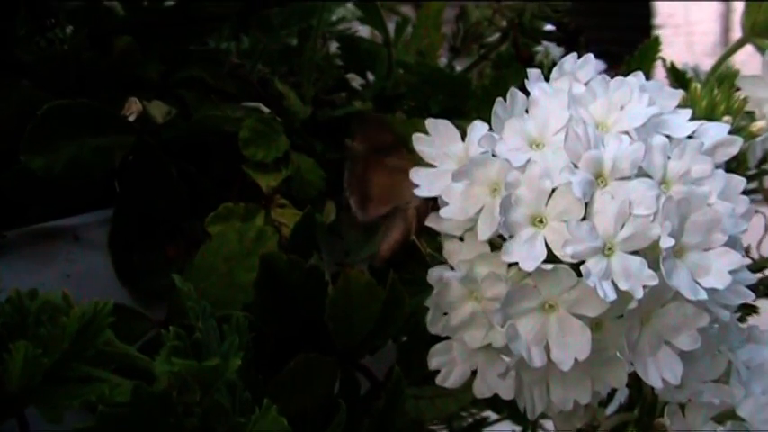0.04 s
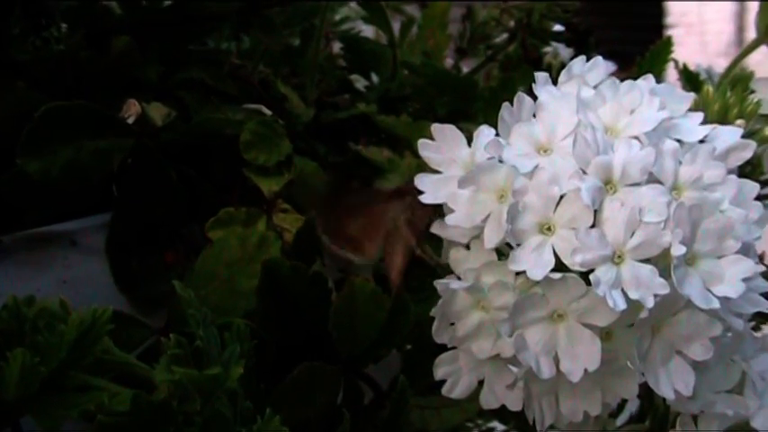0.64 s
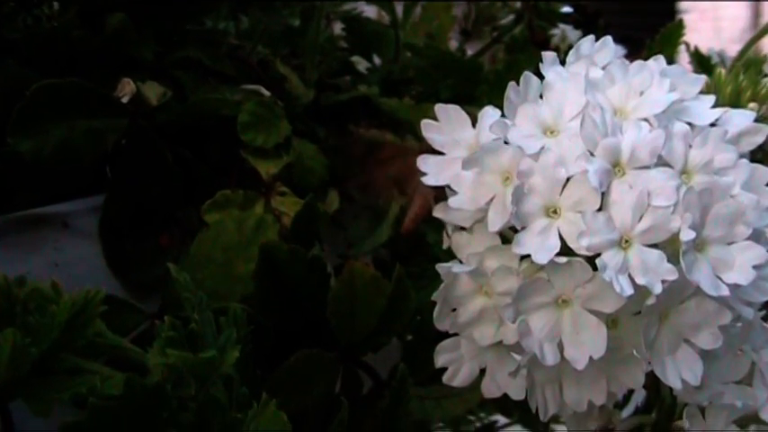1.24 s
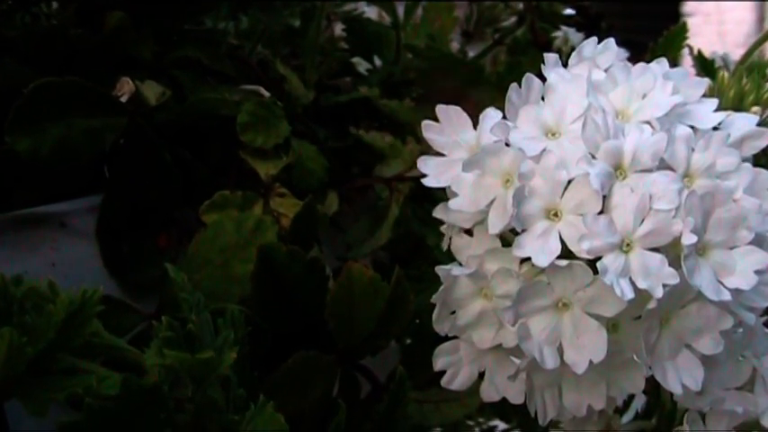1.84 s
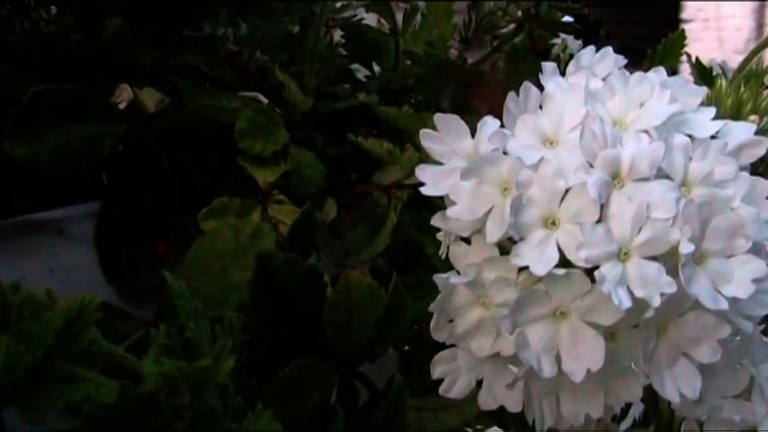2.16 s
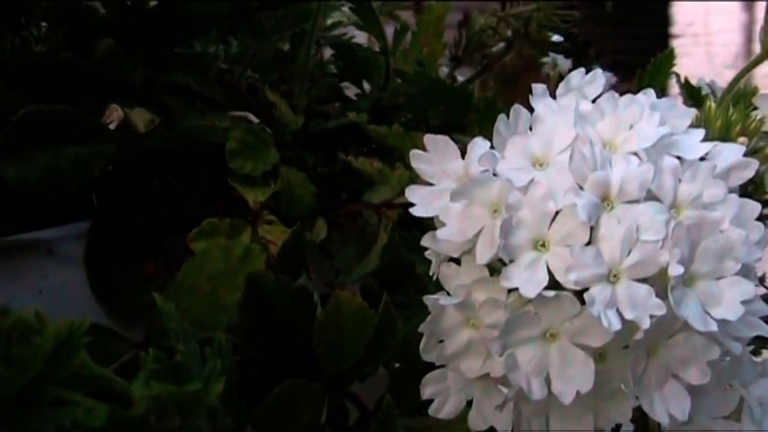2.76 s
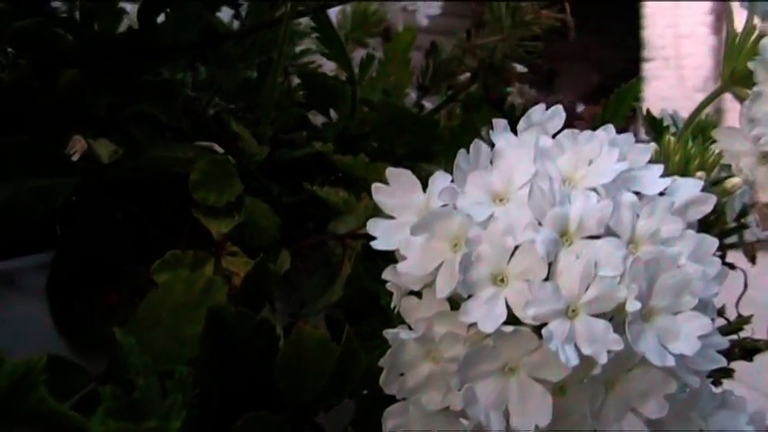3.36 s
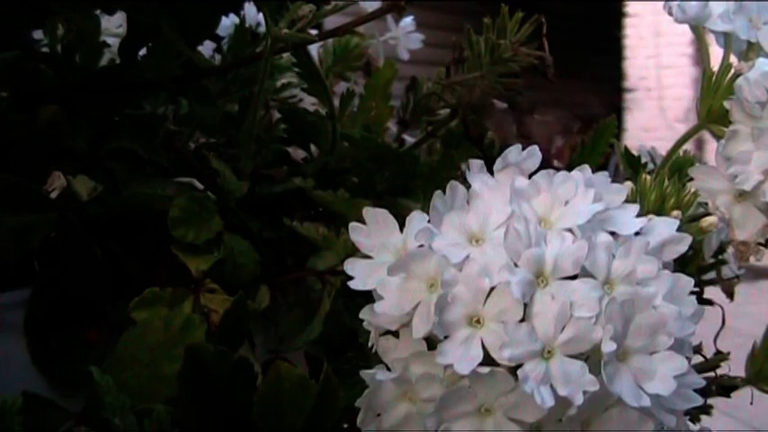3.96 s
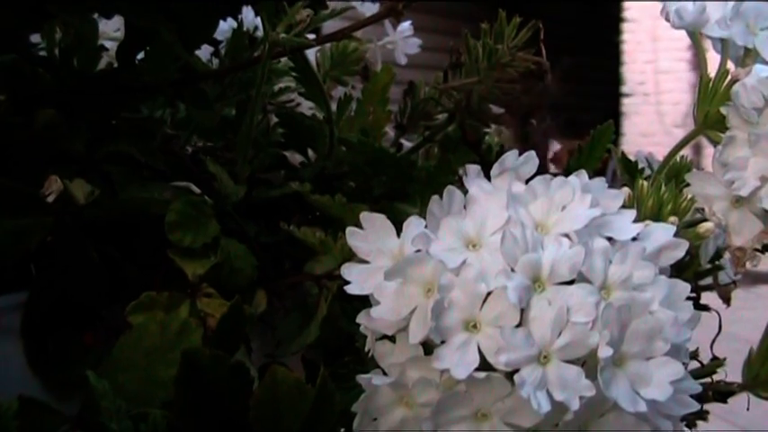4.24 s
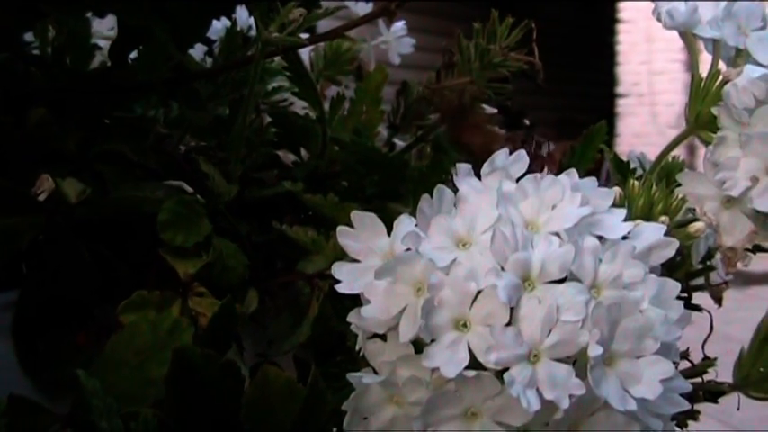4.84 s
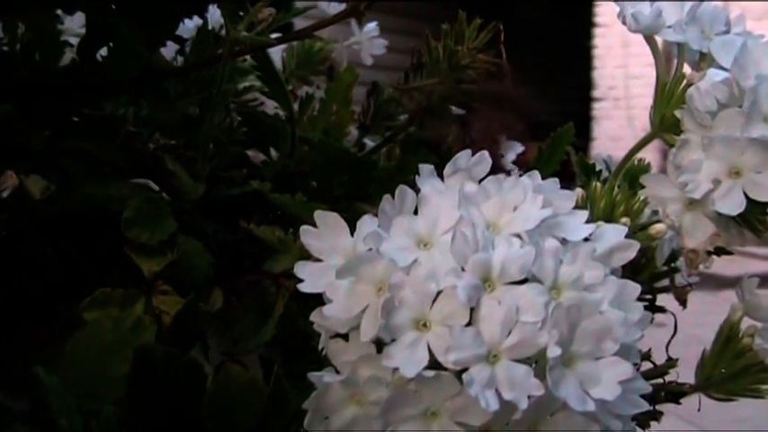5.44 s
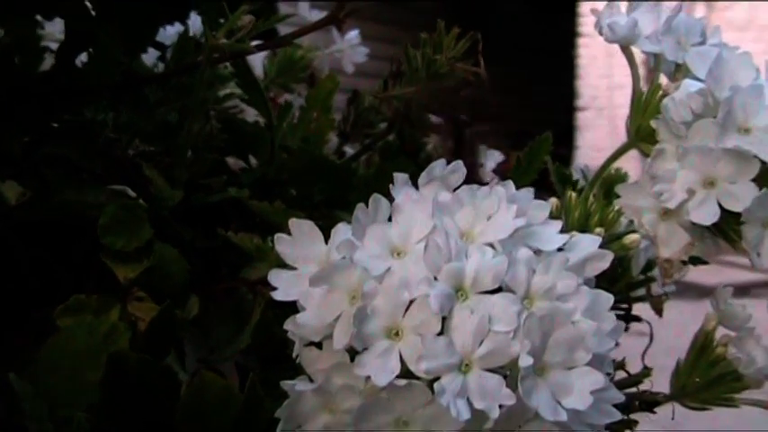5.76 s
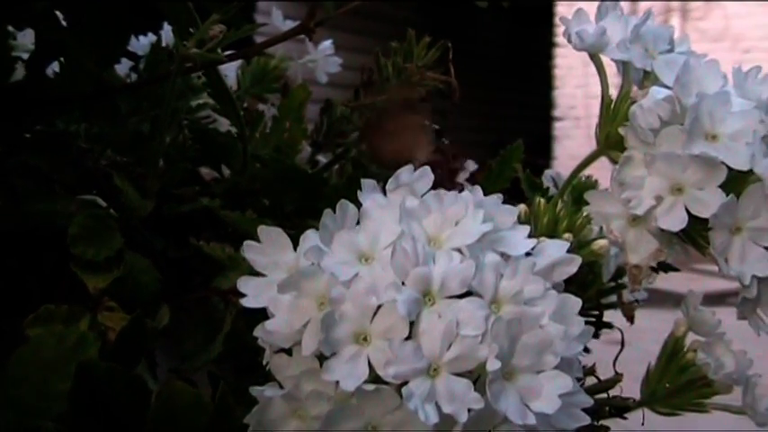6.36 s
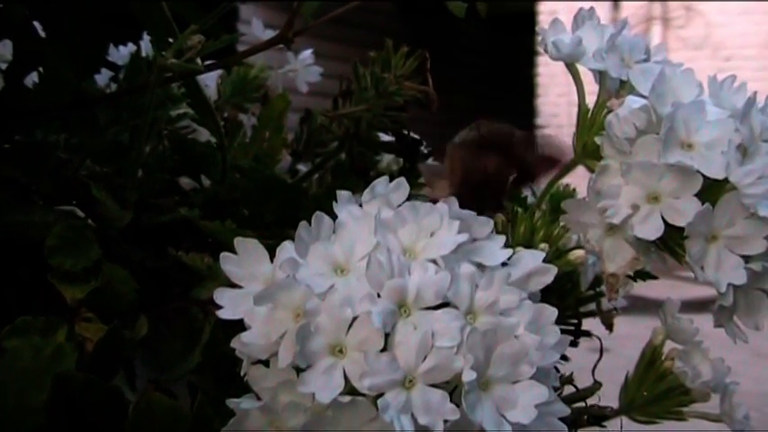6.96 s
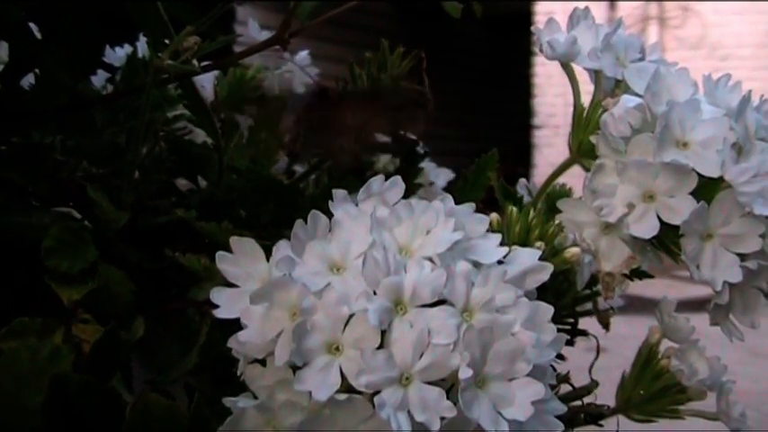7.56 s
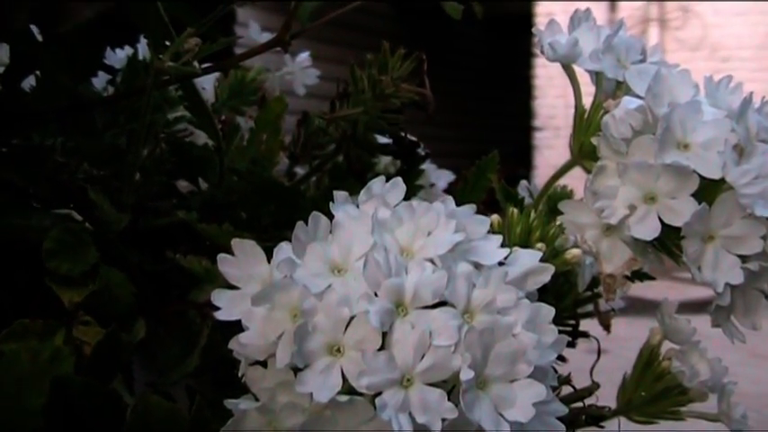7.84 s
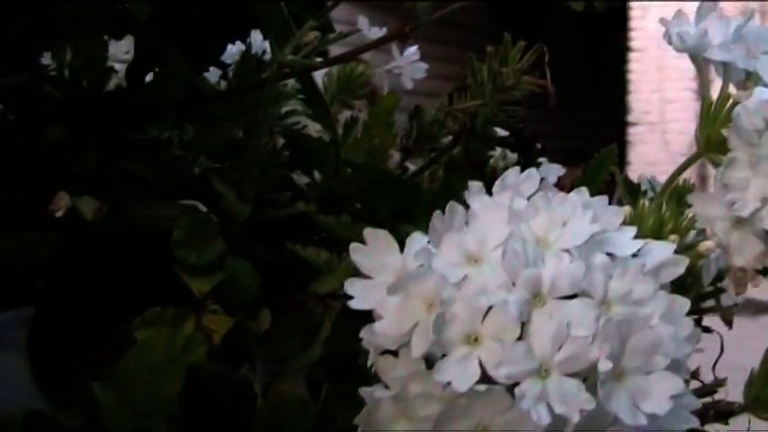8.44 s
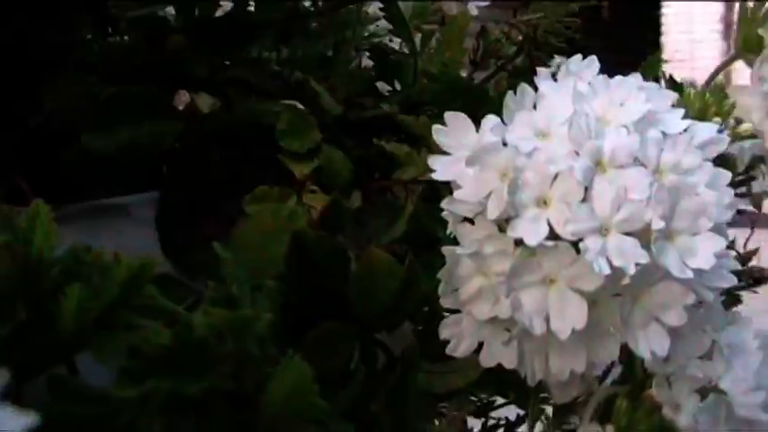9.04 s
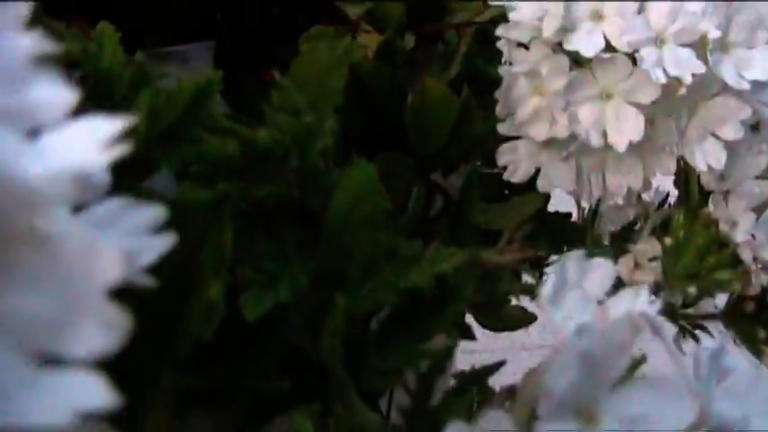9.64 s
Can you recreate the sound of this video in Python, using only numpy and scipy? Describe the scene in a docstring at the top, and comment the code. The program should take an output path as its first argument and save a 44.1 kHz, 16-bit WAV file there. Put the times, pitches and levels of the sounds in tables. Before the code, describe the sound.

Soft outdoor rumble, a steady far machine hum and thin bird chirps, then a moth buzzes right by with rapid wingbeats.

```python
"""A soft wash of outdoor air, a far machine's steady hum and thin, high bird calls fill a garden at dusk.
A moth flutters faintly at a flower head, then flies right past the two microphone ports at about 9 s.
Each wing stroke pushes the air and sucks it back, and the quick strokes blur into a low buzz.
The hand on the camera makes a few ticks, one soft bump and a short rustle as it swings away."""
import sys
import numpy as np
from scipy import signal
from scipy.fft import rfft, irfft
from scipy.io import wavfile
from scipy.ndimage import uniform_filter1d

SR = 44100
rng = np.random.default_rng(int(sys.argv[2]) if len(sys.argv) > 2 else 0)


def materialize(psi):
    """Save the field psi as 16-bit PCM at rate SR to the path in sys.argv[1].

    A 1-D psi becomes a single channel; in a 2-D psi each row is a channel.
    """
    bounded = np.clip(np.atleast_2d(psi).T, -1, 1)
    quanta = np.round(bounded * 32767).astype(np.int16)
    wavfile.write(sys.argv[1], SR, quanta)


N = 427329
TIME = np.arange(N) / SR
FREQS = np.fft.rfftfreq(N, 1 / SR)


def amp(db):
    """Turns decibels into a number to multiply by."""
    return 10 ** (np.asarray(db) / 20)


def unit_rms(x):
    """Scales a signal so that its average strength (rms) is 1."""
    return x / np.sqrt(np.mean(x ** 2) + 1e-20)


def over_frequency(points, hz):
    """Joins the points of a table along a logarithmic frequency axis."""
    f, value = np.transpose(points)
    return np.interp(np.log(hz + 1), np.log(f + 1), value)


def over_time(rows):
    """Joins the points of a time table: one curve for each column after the time."""
    s, *columns = np.transpose(rows)
    return [np.interp(TIME, s, column) for column in columns]


def panned(x, pan_db):
    """Spreads a sound over two channels, the left pan_db louder than the right."""
    return np.array([x * amp(pan_db / 2), x * amp(-pan_db / 2)])


def filtered(x, gain):
    """Turns each frequency up or down by its own gain."""
    return irfft(rfft(x) * gain, N)


def drift(rate_hz):
    """A smooth random wobble of rms 1 that changes about rate_hz times a second."""
    coarse = np.arange(0, N + 64, 64)
    f = np.fft.rfftfreq(len(coarse), 64 / SR)
    slow = irfft(rfft(rng.standard_normal(len(coarse))) * np.exp(-(f / rate_hz) ** 2), len(coarse))
    return unit_rms(np.interp(np.arange(N), coarse, slow))


def fuzzy_tone(hz, width_hz):
    """A narrow band of noise of rms 1 that follows a pitch."""
    angle = 2 * np.pi * np.cumsum(hz * np.ones(N)) / SR
    return drift(width_hz) * np.cos(angle) + drift(width_hz) * np.sin(angle)


# How strong the air is from bass to treble: f/Hz, relative level/dB
AIR_COLOUR = [(20, -23), (35, -12), (70, -1.5), (110, -1.5), (230, -2.5), (340, -7.5), (470, -4),
              (700, -8.5), (1100, -12.5), (2300, -16.5), (5000, -23.5), (8000, -29), (12000, -37),
              (15500, -38.8)]
# Small peaks and dips in that colour: f/Hz, width/Hz, gain/dB
AIR_RIPPLE = [(420, 30, 3.5), (605, 30, -2), (810, 90, 2.2), (940, 45, -1.5), (1220, 110, 1.2),
              (2020, 220, -1.2), (2530, 200, 1.8), (2700, 140, -1.8), (3050, 220, 1.4), (3680, 80, 2.5),
              (4130, 80, 2.5)]
# How alike the air is at the two ports: f/Hz, likeness (1 = the same, 0 = unrelated)
AIR_LIKENESS = [(30, .85), (120, 0.87), (300, 0.61), (500, 0.75), (1000, 0.47), (2000, 0.21), (5000, 0.037),
                (9000, -0.23), (15000, -0.038)]
# One swell as the camera swings round: top t/s, half length/s, low wash gain/dB, hiss gain/dB
AIR_SWELL = (9.03, 0.77, 6.9, 1.1)
def air(level_db=-50.5, pan_db=-.4, split_hz=900, hiss_start_db=-.56, rise_db_per_s=.155, flicker_db=.1):
    """Far traffic, leaves and a fan's rush blend into a wide wash with soft, drifting patches."""
    frames, hz = N // 512 + 5, np.fft.rfftfreq(2048, 1 / SR)
    noise = rng.standard_normal((5, frames, len(hz)))
    left, unrelated = noise[0] + 1j * noise[1], noise[2] + 1j * noise[3]
    likeness = over_frequency(AIR_LIKENESS, hz)
    right = likeness * left + np.sqrt(1 - likeness ** 2) * unrelated
    patches_db = unit_rms(uniform_filter1d(uniform_filter1d(noise[4], 10, axis=0), 16, axis=1))
    spectra = np.array([left, right]) * amp(over_frequency(AIR_COLOUR, hz) + patches_db)
    wash = signal.istft(spectra.transpose(0, 2, 1), nperseg=2048, noverlap=1536)[1][:, :N]
    ripple_db = sum(db / (1 + (2 * (FREQS - centre) / width) ** 4) for centre, width, db in AIR_RIPPLE)
    wash = unit_rms(filtered(wash, amp(ripple_db))) * panned(1, pan_db)[:, None]
    low = filtered(wash, 1 / (1 + (FREQS / split_hz) ** 4))
    hiss = wash - low
    top_s, half_s, low_top_db, hiss_top_db = AIR_SWELL
    swell = np.exp(-((TIME - top_s) / half_s) ** 2)
    hiss_db = hiss_start_db + rise_db_per_s * TIME + hiss_top_db * swell + flicker_db * drift(8)
    return amp(level_db) * (low * amp(low_top_db * swell) + hiss * amp(hiss_db))


# The tones in the hum: multiple of the motor's pitch, level/dB, share that wavers (0 to 1)
HUM_TONES = [(1, -47.5, 0.17), (2, -50, 0.01), (3, -74, 0.3), (5, -64, 0.77), (7, -71, 0.84),
             (11, -74.5, 0.56), (15.58, -75.5, 0.6)]
def machine(pitch_hz=90.13, wander=.00205, waver_hz=4.4):
    """A far motor hums two firm low tones, and higher ones that waver on their way through the air."""
    hz = pitch_hz * (1 + wander * drift(.96))
    angle = 2 * np.pi * np.cumsum(hz) / SR
    hum = np.zeros(N)
    for multiple, db, share in HUM_TONES:
        firm = -np.sqrt(2 * (1 - share ** 2)) * np.cos(multiple * angle)
        hum += amp(db) * (firm + share * fuzzy_tone(multiple * hz, waver_hz))
    return hum


def far_drone(top_s=4.73, half_s=.35, hz=268, level_db=-59):
    """A low tone swells once in the distance."""
    swell = np.exp(-((TIME - top_s) / half_s) ** 2)
    return amp(level_db) * swell * fuzzy_tone(hz, width_hz=5.7)


# Clear bird notes: middle t/s, f/Hz, half length/s
WHISTLE_NOTES = [(5.459, 5520, .045), (5.552, 5510, .035)]
def bird_whistles(level_db=-71, width_hz=50, arch_hz=60):
    """A bird far off whistles short notes that rise and fall a little."""
    notes = np.zeros(N)
    for s, hz, half_s in WHISTLE_NOTES:
        place = np.clip((TIME - s) / half_s, -1, 1)  # -1 at the start of the note, 1 at its end
        notes += np.cos(np.pi * place / 2) * fuzzy_tone(hz - arch_hz * place ** 2, width_hz)
    return amp(level_db) * notes


# Runs of bird calls: first call t/s, last call t/s, relative level/dB, f/Hz
BIRD_CALL_RUNS = [(.02, .37, -66, 5527), (.55, .64, -63.5, 5730), (.87, 1.27, -67, 5630),
                  (1.72, 1.72, -64, 5600), (2.02, 2.16, -64, 5470), (3.05, 3.28, -67, 5535),
                  (3.62, 3.8, -67, 5576), (4.12, 4.33, -67, 5620), (4.49, 4.94, -66.5, 5585),
                  (5.55, 5.98, -66.5, 5560), (6.23, 6.23, -67, 5590), (6.68, 6.97, -63.5, 5525),
                  (7.18, 7.33, -64.5, 5610), (7.56, 7.67, -65, 5610), (7.87, 7.98, -66, 5770),
                  (8.17, 8.17, -67, 5586), (8.61, 8.61, -67, 5520), (9.66, 9.66, -62, 5730)]
def bird_calls(gap_s=.11, half_s=.072, arch_hz=160, scatter_hz=50.04, rasp_db=-3, gain_db=-3.1):
    """Birds repeat thin, raspy calls that arch in pitch, no two quite alike, blurred by distance."""
    level = np.zeros(N)
    pitch = np.full(N, np.mean([row[3] for row in BIRD_CALL_RUNS]))
    for first, last, db, hz in BIRD_CALL_RUNS:
        for s in np.linspace(first, last, round((last - first) / gap_s) + 1):
            louder_db, higher = rng.standard_normal(2)
            span = slice(*np.searchsorted(TIME, [s - half_s, s + half_s]))
            place = (TIME[span] - s) / half_s
            call = amp(db + louder_db) * np.cos(np.pi * place / 2) ** 2
            arch = hz + scatter_hz * higher + arch_hz * (.2 - 2 * place ** 2)
            pitch[span] = np.where(call > level[span], arch, pitch[span])  # the louder call wins
            level[span] = np.maximum(level[span], call)
    direct, left, right = (
        fuzzy_tone(pitch, width_hz=360) + amp(rasp_db) * fuzzy_tone(.88 * pitch, width_hz=900)
        for _ in range(3))
    return amp(gain_db) * level * (.65 * direct + .83 * np.array([left, right]))


def knock(s, db, hz, decay_s, pan_db, quality):
    """A touch makes a burst of noise that rings briefly in the camera body."""
    t = np.arange(SR // 4) / SR
    bursts = rng.standard_normal((3, len(t))) * np.exp(-t / decay_s)
    blow = .5 * bursts[:2] + bursts[2]  # one burst for each side, one shared
    blow[:, 0] += 4  # the first contact is the hardest
    body = signal.iirpeak(hz, quality, SR)
    ring = signal.lfilter(*body, signal.lfilter(*body, blow))
    track, start = np.zeros((2, N + len(t))), round(s * SR)
    track[:, start:start + len(t)] = panned(amp(db), pan_db)[:, None] * ring / abs(ring).max()
    return track[:, :N]


# Ticks of the casing: t/s, peak level/dB, f/Hz, decay/s, left minus right/dB, quality (higher = purer)
CASING_TICKS = [(1.542, -43, 1500, .0036, -13, 1.6), (1.600, -45.5, 5700, .002, -1, 3),
                (1.731, -35.5, 1620, 0.0016, -4, 1), (1.961, -50, 3200, .002, 0, 1.2),
                (2.427, -53, 7500, .003, 0, 1.6), (7.129, -51, 8000, .002, -1, 1.4),
                (8.910, -42, 1580, .002, -2, 2), (9.061, -42, 4200, .002, 2, 1),
                (9.346, -45, 5900, .0035, 0, 1.2), (9.489, -48, 8000, 0.0067, 5, 1.2)]
def camera_knocks():
    """The hand makes the casing tick and gives it one soft, low bump."""
    ticks = sum(knock(*row) for row in CASING_TICKS)
    return ticks + knock(s=6.066, db=-40, hz=230, decay_s=.045, pan_db=0, quality=1.1)


# How strong the rubbing is from bass to treble: f/Hz, relative level/dB
FINGER_COLOUR = [(200, -13), (700, 0.5), (2000, 5.5), (4000, -1.5), (7000, -6), (11000, -13), (15000, -12)]
def finger_rub(start_s=9.35, hold_s=.17, attack_s=.04, release_s=.059, level_db=-54.5, per_s=2400):
    """Fingers stick and slide on the camera; many tiny clicks add up to one short rustle."""
    clicks = (rng.random((2, N)) < per_s / SR) * rng.choice([-1, 1], (2, N))
    click_db = 5 * np.minimum(rng.exponential(1, (2, N)), 3) + 1.5 * drift(50)  # uneven, in clumps
    rustle = unit_rms(filtered(clicks * amp(click_db), amp(over_frequency(FINGER_COLOUR, FREQS))))
    before, after = np.maximum(start_s - TIME, 0), np.maximum(TIME - start_s - hold_s, 0)
    return amp(level_db) * np.exp(-before / attack_s - after / release_s) * rustle


def far_moth(beat_hz=49.3, wander=.0331, level_db=-67, roam_db=4, approach_s=7.16, rise_db_per_s=18):
    """Only a soft, low flutter carries as the moth drifts among the leaves; it grows on the approach."""
    angle = 2 * np.pi * np.cumsum(beat_hz * (1 + wander * drift(2.26))) / SR
    flutter = np.sin(angle) + .84 * np.sin(2 * angle) + .14 * np.sin(3 * angle)
    to_and_fro_db = roam_db * drift(1.4) * np.interp(TIME, [approach_s, MOTH_VISIT[0]], [1, 0])
    approach_db = rise_db_per_s * np.maximum(TIME - approach_s, 0)
    fade = np.interp(TIME, MOTH_VISIT[:2], [1, 0])  # the close sound takes over
    return amp(level_db + to_and_fro_db + approach_db) * flutter * fade


# Arches of the moth's whirr: start t/s, length/s, top f/Hz, level/dB
WHIRR_ARCHES = [(8.209, .76, 575.5, -50), (8.931, .44, 508.4, -46.5)]
def wing_whirr(beats, sag=.21, waver=.016, fuzz=.56, throb=.22):
    """A faint tone rises and falls above the wingbeats, throbbing with them."""
    whirr = np.zeros(N)
    for start, length, top_hz, db in WHIRR_ARCHES:
        place = np.clip(2 * (TIME - start) / length - 1, -1, 1)
        hz = top_hz * (1 - sag * place ** 2) * (1 + waver * drift(24.6))
        tone = np.cos(2 * np.pi * np.cumsum(hz) / SR) + fuzz * fuzzy_tone(hz, width_hz=45)
        whirr += amp(db) * np.sqrt(1 - place ** 2) * unit_rms(tone)
    return whirr * (1 + throb * np.cos(2 * np.pi * beats))


def wing_stroke(beats, width):
    """Once in each beat a wing pushes the air, then sucks it back."""
    swing = np.tanh(np.tan(np.pi * beats) / (np.pi * width))
    return -swing * (1 - swing ** 2)


def wingbeats(beats, width, nearness, up_share=.39, up_delay_beats=.425, sway=.23):
    """A strong downstroke, a weaker upstroke and the slow sway of air between them."""
    down = wing_stroke(beats, width)
    up = up_share * wing_stroke(beats - up_delay_beats, .92 * width)
    return down + up - sway * (1 - nearness) * np.sin(2 * np.pi * beats)


# The moth comes close, then darts off: fade-in start t/s, end t/s, fade-out start t/s, end t/s
MOTH_VISIT = (8.09, 8.18, 9.42, 9.445)
# How fast the wings beat: t/s, f/Hz
WINGBEAT_RATE = [(8.1, 46.5), (8.286, 48.9), (8.592, 50.3), (8.8, 45.1), (8.882, 46.1), (9.002, 50.0),
                 (9.216, 46.0), (9.274, 47.1), (9.44, 52.7)]
# The flight past the ports: t/s, relative level/dB, stroke sharpness/dB, left minus right/dB
MOTH_FLIGHT = [(8.14, -45, -4.5, -1.5), (8.2, -37, -5, 1.5), (8.248, -42, -4.5, 2.0),
               (8.298, -32.5, -4.5, -3.5), (8.36, -32.5, -6.5, -0.5), (8.406, -38, -4, -8),
               (8.484, -34.5, -2, 1), (8.616, -38.5, -4.5, 0.5), (8.712, -30.5, -2, 2),
               (8.762, -40.5, -6.5, 0.5), (8.9, -34, -8.5, -3.5), (8.946, -36, 1.5, -10),
               (8.99, -26, -9.5, -4), (9.022, -35, -11, -6.0), (9.044, -28, -12, -3.0),
               (9.106, -25, -9.5, -7), (9.152, -14, -1.5, 4), (9.196, -15, -2.5, 4.5), (9.222, -30, -8, 9),
               (9.298, -29, -6, -2.5), (9.362, -29, -3.5, 0.5), (9.44, -40, -13.5, 0.0)]
def near_moth(closest_s=9.1735, uneven=.34, thin_hz=52, eddy_hz=260, eddy_share=.36, gain_db=2):
    """Wings beat past the microphone; the nearer they are, the more their draught leads on the right."""
    level_db, sharp_db, pan_db = over_time(MOTH_FLIGHT)
    beats = np.cumsum(over_time(WINGBEAT_RATE)[0]) / SR  # a running count of wingbeats
    beats -= np.interp(closest_s, TIME, beats)  # a downstroke lands at the closest moment
    nearness = amp(level_db - level_db.max()) ** .73
    width = np.clip(.073 * amp(-.76 * sharp_db), .05, .16)
    lead_beats = np.interp(nearness, [0, 1], [.048, .0864])
    draught = np.array([wingbeats(beats + side * lead_beats, width, nearness) * (1 + uneven * drift(35))
                        for side in (-.5, .5)])
    # small wings push the lowest tone only weakly
    draught = filtered(draught / np.sqrt(width), FREQS ** 2 / (FREQS ** 2 + thin_hz ** 2))
    # eddies, little swirls of air shed by the wings, buffet each port separately
    eddy_band = FREQS / (FREQS + 30) / (1 + (FREQS / eddy_hz) ** 4)
    eddies = unit_rms(filtered(rng.standard_normal((2, N)), eddy_band))
    buzz = unit_rms(draught) + eddy_share * (1 - nearness) * eddies
    fade = np.interp(TIME, MOTH_VISIT, [0, 1, 1, 0])
    return fade * (panned(amp(level_db + gain_db), pan_db) * buzz + wing_whirr(beats))


def scene():
    """Adds up all the sounds that reach the two ports."""
    background = air() + machine() + far_drone()
    moth = near_moth() + far_moth()
    return background + moth + bird_calls() + bird_whistles() + camera_knocks() + finger_rub()


def record(dry, low_cut_hz=31, high_cut_hz=15780):
    """The microphone loses the deepest bass, then the highest treble is cut off."""
    thinned = filtered(dry, 1 - 1 / (1 + (FREQS / low_cut_hz) ** 6))
    treble_cut = signal.firwin(801, high_cut_hz, window=("kaiser", 10), fs=SR)
    return signal.oaconvolve(thinned, treble_cut[None], "same")


dry = scene()
out = record(dry)
materialize(out)
```